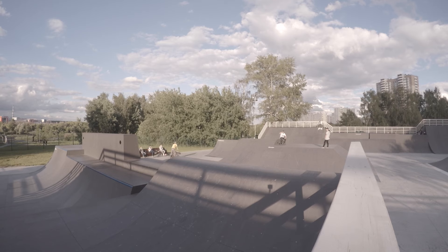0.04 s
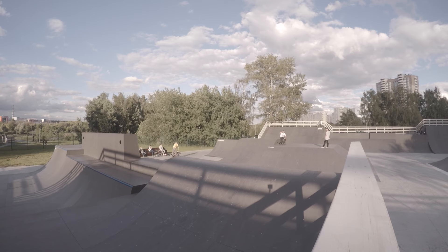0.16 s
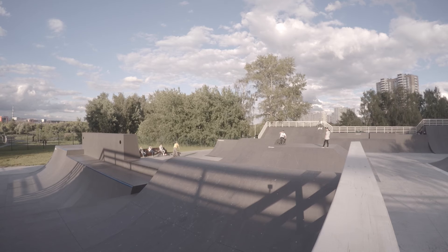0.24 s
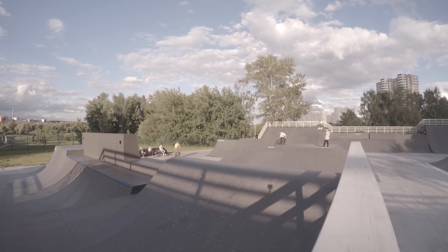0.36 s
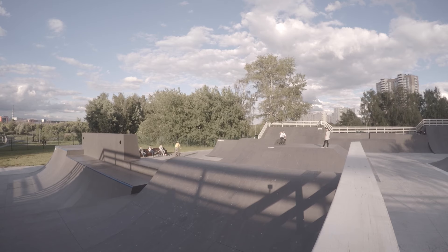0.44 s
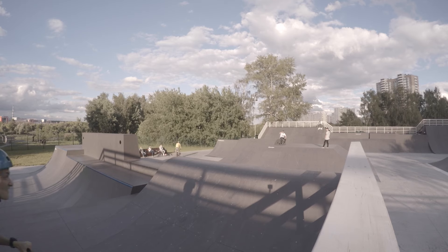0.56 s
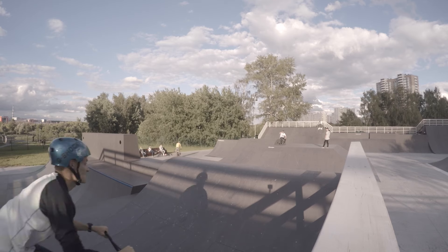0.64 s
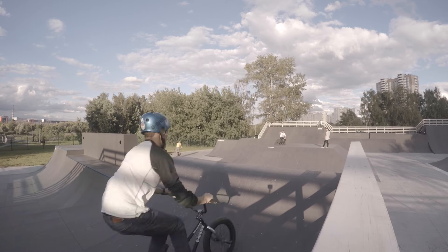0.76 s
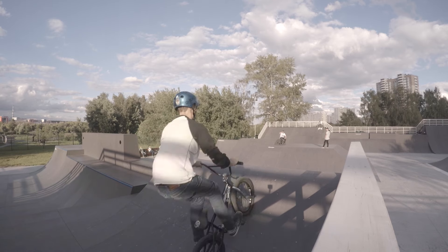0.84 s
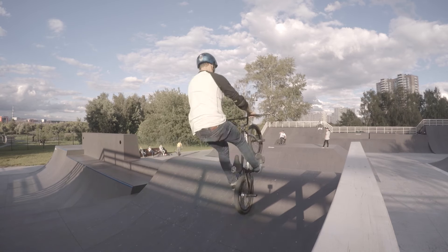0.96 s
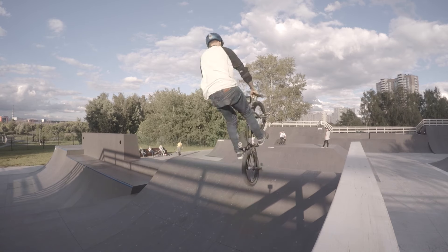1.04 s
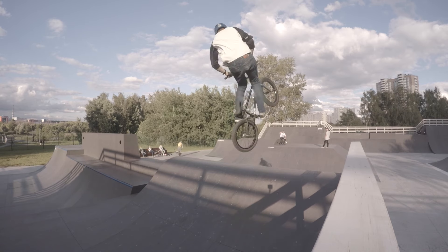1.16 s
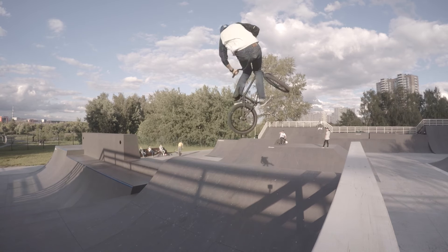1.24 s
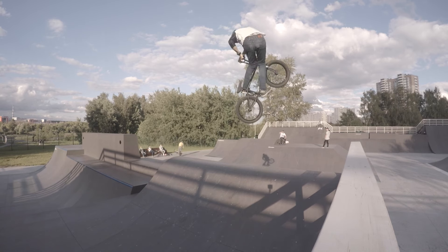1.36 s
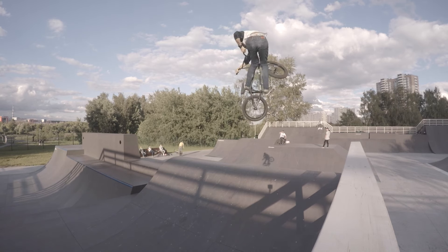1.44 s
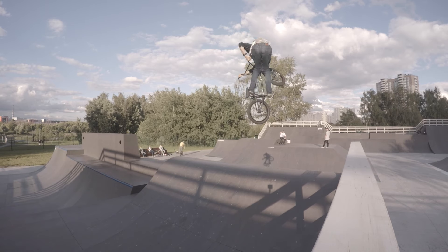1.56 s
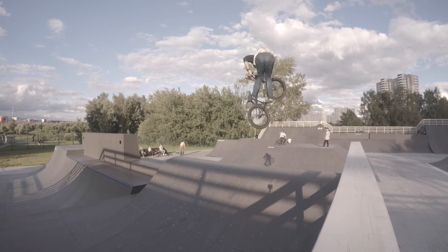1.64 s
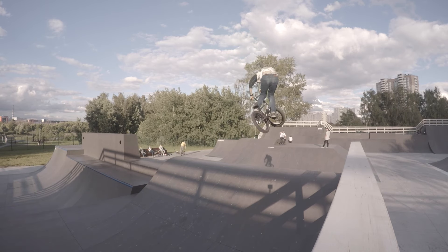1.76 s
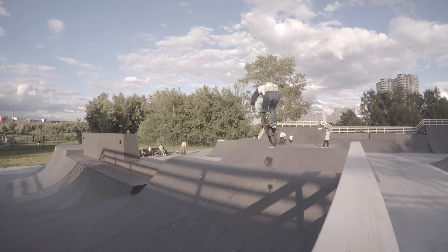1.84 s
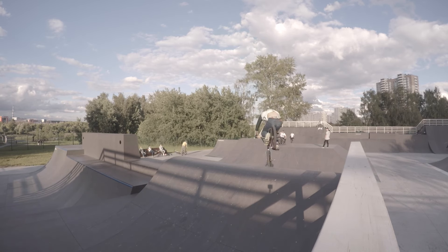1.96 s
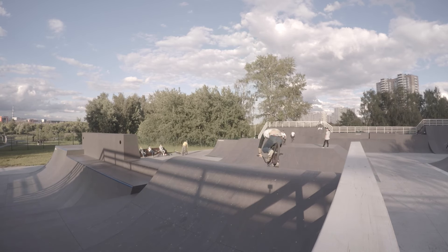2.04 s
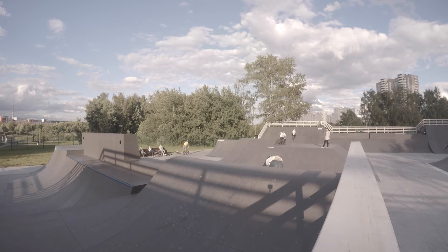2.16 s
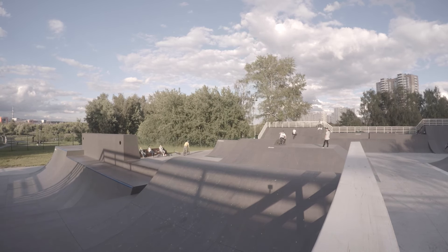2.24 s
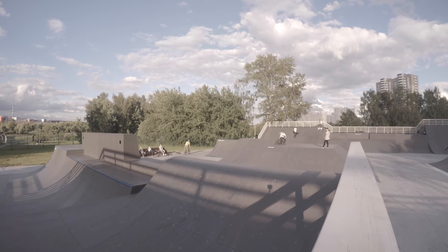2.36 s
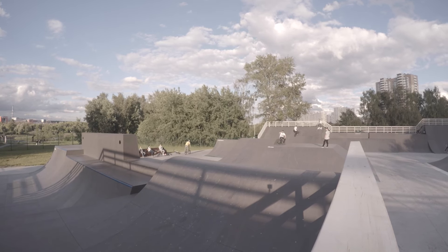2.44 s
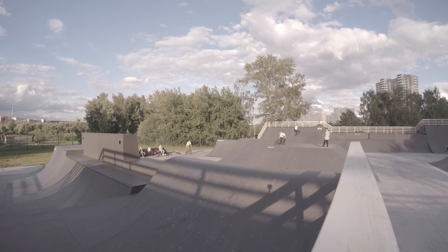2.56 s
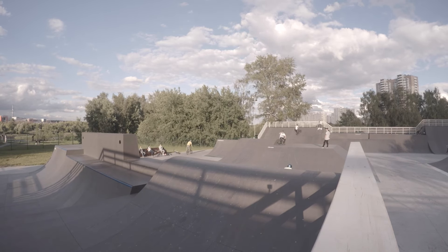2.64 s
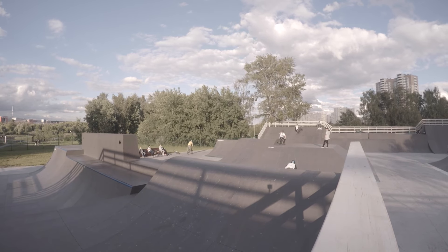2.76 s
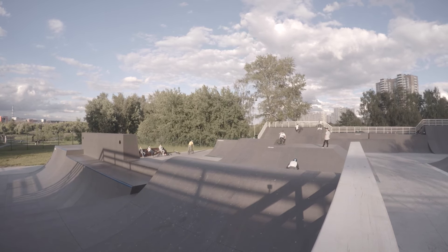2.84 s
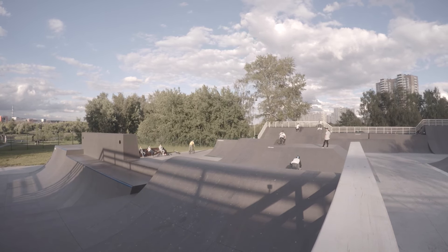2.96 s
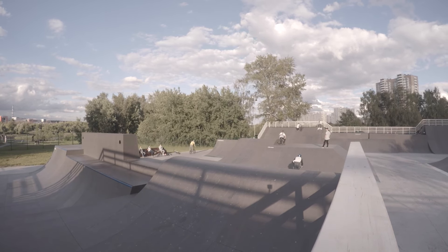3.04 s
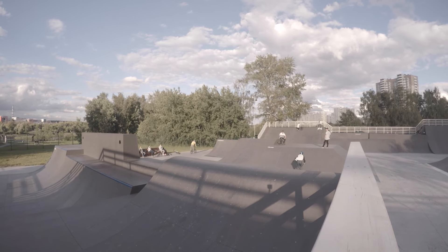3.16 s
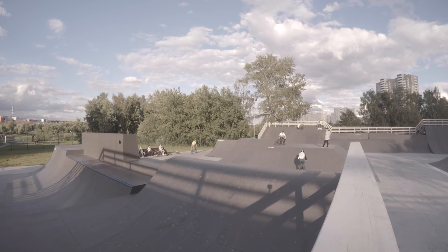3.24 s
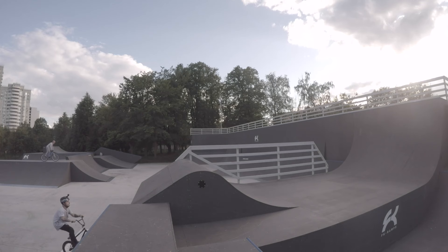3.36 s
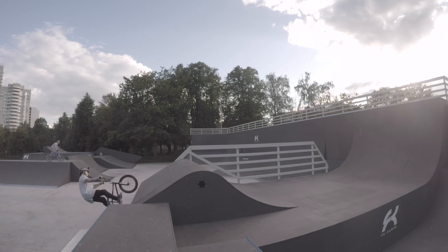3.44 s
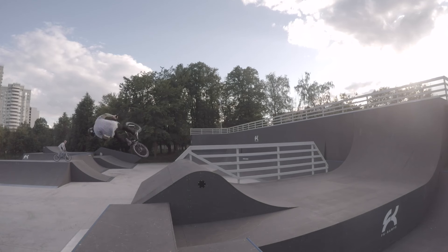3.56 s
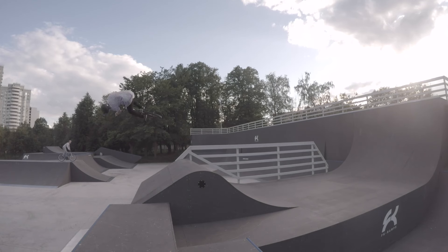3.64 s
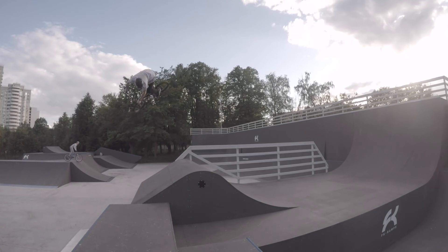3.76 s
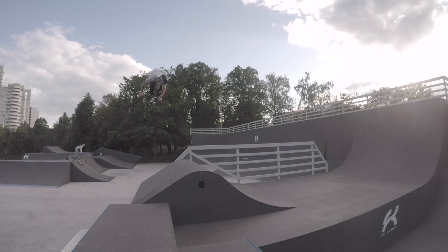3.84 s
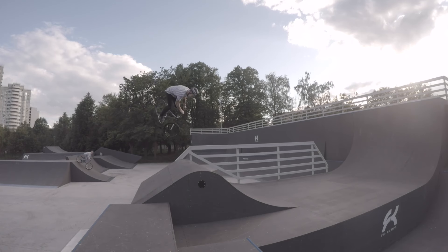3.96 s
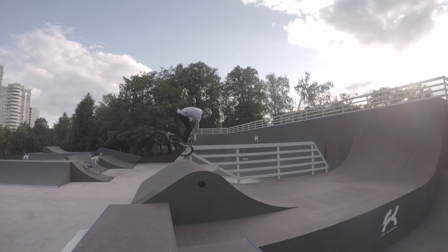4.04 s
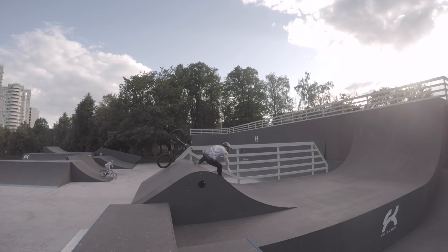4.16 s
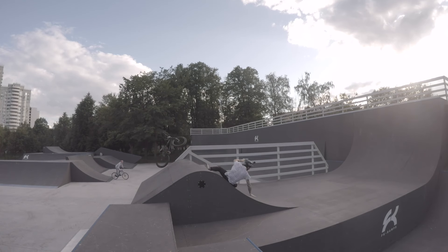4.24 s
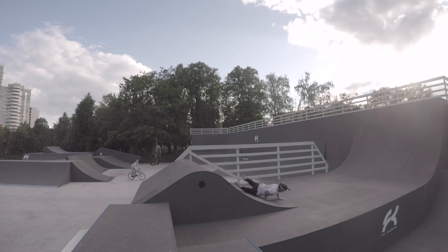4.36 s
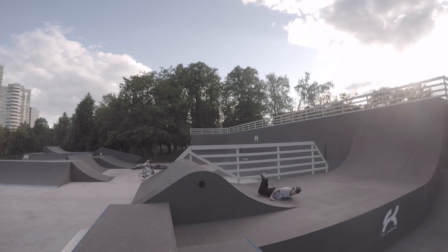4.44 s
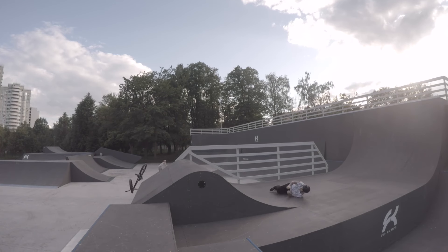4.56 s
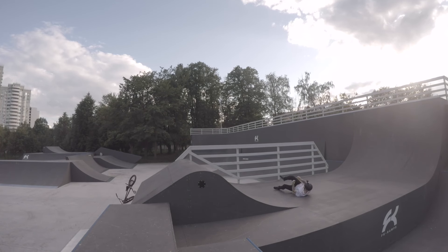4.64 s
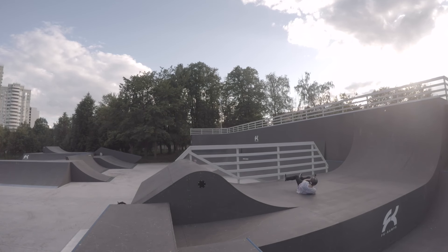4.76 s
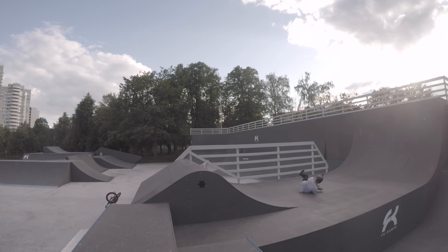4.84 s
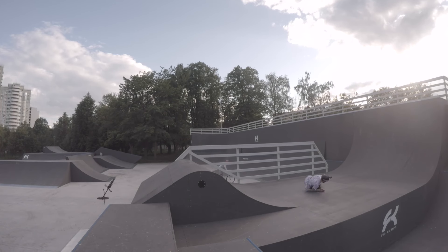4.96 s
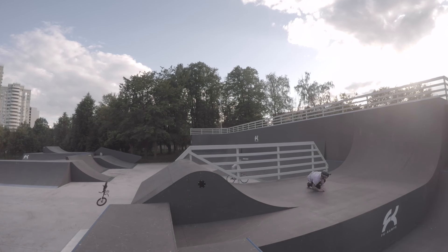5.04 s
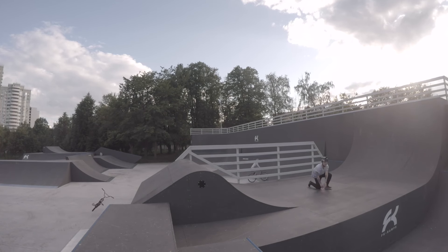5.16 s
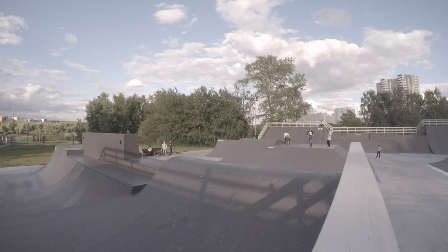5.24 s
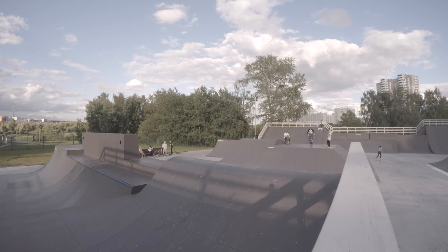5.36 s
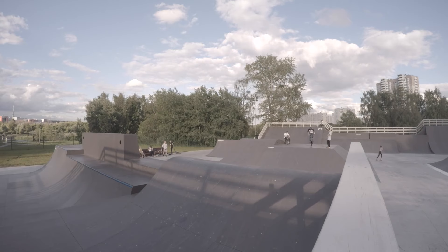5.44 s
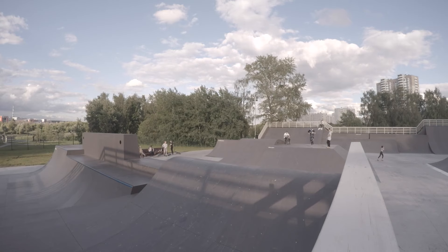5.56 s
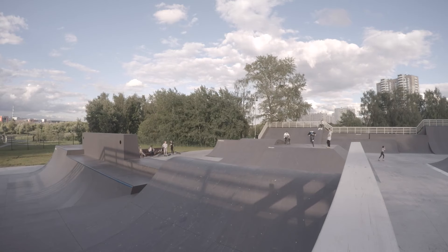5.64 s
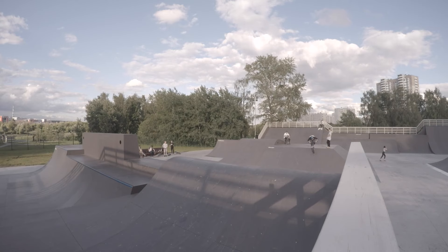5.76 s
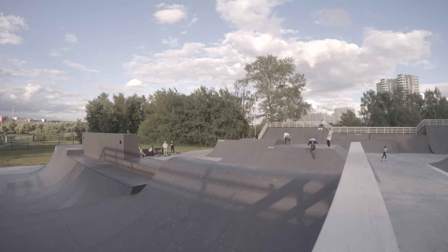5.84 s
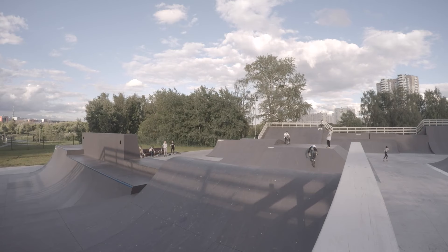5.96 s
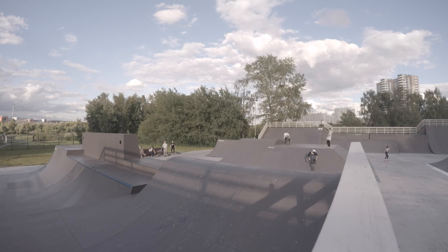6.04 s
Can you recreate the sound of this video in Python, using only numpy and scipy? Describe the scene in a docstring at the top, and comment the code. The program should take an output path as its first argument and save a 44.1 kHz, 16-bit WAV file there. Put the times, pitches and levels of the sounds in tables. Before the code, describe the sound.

Three joined outdoor views of bikes on hollow ramps, heard by one mono wind-buffeted microphone. First tyre roar and hub buzz swell past, turn into sparse ticking during a jump, then a deep landing thud and loose frame clatter. A click marks the cut to a close crash: boom, board knocks, tubes clanking, body and bike rubbing and sliding, metallic tumbles. Finally, distant traffic, low gusts and a tiny squeak.

```python
"""Bikes on hollow wooden ramps

An outdoor skatepark in three joined shots. A bike passes on roaring tyres, its freewheel buzzing as clicks in a hub;
it jumps, lands with a boom and rattles away as clacks in a ringing frame. From a second spot, close by, a rider
crashes: blows ring wood, tubes and small parts over rubbing noise; then the first spot again. Far city traffic
is shaped noise, wind on the microphone is low noise in gusts, and a thin whine is two beating tones."""
import sys
import numpy as np
from scipy import signal
from scipy.fft import rfft, irfft, next_fast_len
from scipy.io import wavfile
from scipy.ndimage import uniform_filter1d, map_coordinates

SR = 44100
rng = np.random.default_rng(int(sys.argv[2]) if len(sys.argv) > 2 else 0)


def linear_from_db(decibels):
    """Turn decibels (scalar or array-like) into linear amplitude factors; 0 gives 1."""
    return 10 ** (np.asarray(decibels, float) / 20)


def pcm_store(signal):
    """Save signal as 16-bit PCM."""
    levels = np.round(np.clip(np.atleast_2d(signal), -1, 1) * 32767)
    wavfile.write(sys.argv[1], SR, levels.astype(np.int16).T)


N = 269010  # length [samples]
TIME = np.arange(N) / SR  # [s]

# Colour of wheels on plywood: (frequency [Hz], relative density [dB])
ROAR_COLOUR = [(200, -14), (550, -12), (850, -10.5), (1370, -26.5), (3000, -49), (9000, -120)]
# Low ground, wind on the microphone and wheels drumming the decks: (time [s], rumble [dB], drumming [dB])
LOW_GROUND = [(0, -34, -35), (.08, -24.5, -34), (1.0, -21, -35), (1.15, -30.5, -49), (2.2, -32, -46),
              (2.6, -26.5, -30), (2.9, -33, -50), (3.24, -32, -53.5), (3.44, -25.5, -28), (3.7, -30.5, -47),
              (4.05, -29, -39), (4.5, -25, -52), (4.8, -22, -35.5), (5.34, -29, -53), (6.1, -35.5, -38.5)]
# Weight dropping on a hollow ramp: (time [s], hold of the boom [s], boom [dB], boards [dB])
RAMP_THUDS = [(0.558, 0, -41, -26), (2.249, 0.091, -11, -14.5), (2.47, 0.024, -18, -35.5),
              (3.504, 0, -9, -49), (4.176, 0.013, -9.5, -13.5), (4.311, 0.049, -20.5, -17.5),
              (4.415, 0.0064, -4, -22), (4.593, 0.081, -15.5, -20.5)]
BOOM_FALL_DB_PER_S = 220


def unit(x):
    """Scale to rms 1."""
    return x / np.sqrt(np.mean(x ** 2) + 1e-20)


def curves(rows, outside=-120):
    """One value per sample for each column after the time; None holds the end values."""
    s, *cols = np.transpose(rows)
    return [np.interp(TIME, s, c, outside, outside) for c in cols]


def wobble(rate):
    """A smooth random curve, rate knots a second."""
    knots = rng.standard_normal(int(N * rate / SR) + 4)
    return map_coordinates(knots, [np.arange(N) * rate / SR])


def filtered(x, response):
    """Multiply the spectrum of x by a complex response of frequency."""
    m = next_fast_len(N + 8192)
    return irfft(rfft(x, m) * response(np.fft.rfftfreq(m, 1 / SR)), m)[:N]


def colour(points):
    """Gain through (Hz, dB) points on a log frequency axis."""
    f, db = np.transpose(points)
    return lambda hz: linear_from_db(np.interp(np.log(hz + 1), np.log(f + 1), db))


def body(modes):
    """Causal response of (Hz, width Hz, dB) resonances, with alternating signs."""
    def response(f):
        total = 0
        for k, (centre, width, db) in enumerate(modes):
            damping = 1j * f * width
            total = total + (-1) ** k * linear_from_db(db) * damping / (centre * centre - f * f + damping)
        return total
    return response


def dull(x, top_hz):
    """Weaken steeply what lies above top_hz."""
    return filtered(x, lambda f: 1 / (1 + (f / top_hz) ** 8))


def rush(response, patchy_db):
    """Coloured noise of rms 1 with patches of random gain in time and frequency."""
    z = signal.stft(rng.standard_normal(N), nperseg=512)[2]
    field = uniform_filter1d(rng.standard_normal(z.shape), 5, 0)
    field = uniform_filter1d(field, 8, 1)
    patchy = signal.istft(z * linear_from_db(patchy_db * unit(field)), nperseg=512)[1][:N]
    return unit(filtered(patchy, response))


def steady(x, seconds):
    """Even out the chance swells of narrow noise that are slower than seconds."""
    power = np.abs(uniform_filter1d(x * x, max(3, int(seconds * SR))))
    return unit(x / np.sqrt(power + 0.018))


def bursts(times, levels_db, lengths, attack=0.0008):
    """Envelope of sudden contacts that die by 60 dB in their length [s]."""
    out, t = np.zeros(N + SR), np.arange(SR // 4) / SR
    for s, db, life in zip(times, levels_db, lengths):
        out[round(s * SR):][:len(t)] += linear_from_db(db - 60 * t / life) * (1 - np.exp(-t / attack))
    return out[:N]


def swells(times, holds, levels_db, fall_db_per_s):
    """Sum of gains that rise at 800 dB/s to a level, hold it and fall away."""
    total = np.zeros(N)
    for s, hold, db in zip(times, holds, levels_db):
        before = 800 * (s - TIME)
        after = fall_db_per_s * (TIME - s - hold)
        total += linear_from_db(db - np.maximum(0, np.maximum(before, after)))
    return total


def struck(envelope, modes):
    """Contact noise under an envelope rings a body."""
    noise = np.tanh(rng.standard_normal(N))  # an even grain, so that strength follows the envelope
    return filtered(envelope * noise, body(modes)) / np.std(filtered(noise, body(modes)))


def passing_bike():
    """Tyres roar, hiss and hum; the freewheel's pawls click in the steel hub."""
    # The pass: (time [s], tyre roar [dB], tyre hiss or low hub ring [dB], high hub ring [dB])
    pass_levels = [(0, -34, -43.5, -53), (0.15, -39, -46, -56), (0.4, -49.5, -47.5, -52.5),
                   (0.65, -43.5, -43, -56.5), (0.85, -35.5, -37, -59.5), (1.03, -44, -44.5, -65),
                   (1.12, -48, -57, -64.5), (1.8, -58, -56.5, -64.5), (2.2, -72, -67, -80)]
    # Tread hum, at last speeding up toward the lip: (time [s], pitch [Hz], hum [dB], octave [dB])
    tread = [(.3, 252, -49, -54), (.55, 237.2, -43, -48), (.68, 259.3, -41.5, -52),
             (.79, 314.5, -39.5, -40), (.98, 338, -46.5, -45)]
    # Freewheel rolling, then in the air, wavering as the bike turns: (time [s], click rate [1/s])
    pawls = [(0, 190), (.55, 120), (.75, 170), (1, 126), (1.1, 66), (1.2, 43), (1.31, 66), (1.42, 60),
             (1.49, 42.6), (1.56, 54), (2.2, 67)]
    # Tyre hiss: (frequency [Hz], relative density [dB])
    hiss_colour = [(1400, -5), (2600, -1.5), (3300, -0.5), (4050, 1.5), (5600, -12.5), (13000, -24)]
    # Low ring of the hub shell: (centre [Hz], width [Hz], relative level [dB])
    shell_modes = [(2400, 900, -6), (3700, 380, 0), (4550, 380, 0)]
    # High ring of the hub: (centre [Hz], width [Hz], relative level [dB])
    hub_modes = [(7740, 930, 8), (9730, 1600, 5), (12700, 3300, 2), (14800, 1500, 3)]

    roar_db, mid_db, hub_db = curves(pass_levels)
    hz, hum_db, octave_db = curves(tread)
    speed = np.maximum(hz, 0) * (1 + 0.018 * wobble(30.9))  # zero outside the table
    turn = 2 * np.pi * np.cumsum(speed) / SR
    tones = linear_from_db(hum_db) * np.sin(turn) + linear_from_db(octave_db) * np.sin(2 * turn)
    hum = np.sqrt(2) * linear_from_db(2 * wobble(25)) * tones

    rate, = curves(pawls, None)
    teeth = np.cumsum(rate * (1 + 0.019 * wobble(40))) / SR
    # each tooth snaps with uneven size and fades by 60 dB in 12 ms, over a constant floor
    since = (teeth % 1) / rate
    size_db = 3.2 * rng.standard_normal(N)[teeth.astype(int)]
    snap = linear_from_db(size_db - 60 * since / .012) + .1
    clicks = snap * rush(np.ones_like, patchy_db=2)

    # once the tyres leave the ramp their hiss stops and the hub's low ring is left
    airborne = np.clip((TIME - 1.0) / .06, 0, 1)
    hiss = rush(colour(hiss_colour), patchy_db=3.0)
    low_ring = unit(filtered(clicks, body(shell_modes)))
    mid = (1 - airborne) * hiss + airborne * low_ring
    high_ring = unit(filtered(clicks, body(hub_modes)))
    roar = linear_from_db(roar_db + 1.8 * wobble(20)) * rush(colour(ROAR_COLOUR), patchy_db=2.5)
    return roar + hum + linear_from_db(mid_db) * mid + linear_from_db(hub_db) * high_ring


def rattle():
    """Frame and chain clack in clusters of ticks; each clack catches each resonance more or less."""
    # The wheels land, then frame and chain clack unevenly: (time [s], relative level [dB])
    jolts = [(2.2479, -14), (2.264, -15), (2.272, -12), (2.2807, -13.5), (2.297, -24), (2.31, -23),
             (2.329, -21), (2.344, -23), (2.377, -24.5), (2.389, -21.5), (2.4127, -23), (2.4393, -22),
             (2.4633, -22), (2.4817, -22.5)]
    # Loose parts settle into a steady shake: (start [s], end [s], gap [s])
    shake_span = (2.512, 2.9, .0412)
    # Frame resonances: (centre [Hz], width before the filter is cubed [Hz], relative level [dB])
    frame_modes = [(964, 870, -8), (2010, 1620, -13), (2680, 600, -23), (4770, 1100, -27),
                   (6450, 760, -38.5), (7000, 670, -38)]

    shake = np.arange(*shake_span)
    chance = rng.standard_normal((len(shake), 2))
    shake_db = -26.5 - 29 * (shake - shake[0]) + 1.8 * chance[:, 0]  # fades 29 dB/s, scatters 1.8 dB
    shake = shake + .0015 * chance[:, 1]  # scatter in time [s]
    second = shake + .3 * np.gradient(shake)  # each shake strikes again 0.3 of the gap later
    jolt, jolt_db = np.transpose(jolts)
    s, db = np.r_[jolt, shake, second], np.r_[jolt_db, shake_db, shake_db]
    clacks = bursts(s, db, 0 * s + 0.07, attack=0.003) * unit(linear_from_db(1.8 * wobble(400)))
    sound = np.zeros(N)
    for hz, width, level_db in frame_modes:
        steep = lambda f: body([(hz, width, 0)])(f) ** 3
        noise = np.tanh(rng.standard_normal(N))
        caught = linear_from_db(level_db + 2 * wobble(60))
        sound += filtered(clacks * caught * noise, steep) / np.std(filtered(noise, steep))
    return sound


def blows():
    """Blows knock boards, clank in tubes, clink in small parts and echo; one row adds to the join's click."""
    # Blows, and at 3.4372 s the click at the join of two shots; levels before the trims below:
    # (time [s], clank [dB], knock above clank [dB], clink above clank [dB])
    hits = [(3.2639, -36, 14, 4), (3.364, -31, 8.5, 3.5), (3.4372, -31, 15.5, 5.5), (4.1488, -32, -9, 5.5),
            (4.1641, -3.5, 7.5, -15.5), (4.325, -35, 1, -3.5), (4.411, -24.5, 8.5, -3.5),
            (4.433, -43.5, 29.5, 4), (4.575, -23, 7, -4), (4.587, -18, 14.5, -14), (4.8135, -15, 5.5, -11),
            (4.821, -12, -0.5, -4), (4.828, -13.5, 3.5, -12), (4.86, -26, 11, -11), (4.9053, -32, 3, -3),
            (5.235, -39, 19, 1.5), (5.283, -26.5, 8, -12), (5.303, -42, 8, 6)]
    # Resonances of the boards: (centre [Hz], width [Hz], relative level [dB])
    wood = [(302, 147, -7.5), (530, 236, -8.5), (778, 273, -6.5), (981, 385, -11)]
    # The frame's clank: (centre [Hz], width [Hz], relative level [dB])
    tubes = [(1440, 130, 13), (1920, 180, 10), (2283, 127, 15), (2910, 700, 4.5)]
    # Small steel parts: (centre [Hz], width [Hz], relative level [dB])
    parts = [(3600, 130, 4), (4000, 300, 0), (4650, 300, 3), (5550, 450, 0)]
    # Bright edge of each row: (centre [Hz], width [Hz], relative level [dB])
    shine = [(8100, 2200, -3.5), (10400, 1900, 0)]
    # Bright glancing scuffs: (time [s], level [dB])
    swishes = [(4.326, -49), (4.433, -35)]
    # Short knocks on a board: (time [s], level [dB], pitch [Hz])
    hollow_knocks = [(3.7765, -12, 818), (3.805, -11, 616), (3.846, -10, 810), (3.884, -18, 840),
                     (4.492, -17.5, 1270)]

    s, db, knock_db, clink_db = np.transpose(hits)

    def blow(level_db, life):
        echo = bursts(s, level_db - 20, 0 * s + .15)  # from the ramps
        return bursts(s, level_db, 0 * s + life) + echo

    knock = dull(struck(blow(db + knock_db - 6.5, 0.053), wood), top_hz=1970)
    clank = dull(struck(blow(db - 5, 0.019), tubes), top_hz=4360)
    clink = dull(struck(blow(db + clink_db - 2.5, 0.016), parts), top_hz=6000)
    swish, swish_db = np.transpose(swishes)
    edge_s = np.r_[s, swish]
    bright = bursts(edge_s, np.r_[db - 38, swish_db], 0 * edge_s + 0.045)
    hollow = np.zeros(N)
    for at, level_db, hz in hollow_knocks:
        hollow += bursts([at], [level_db], [0.028]) * np.sin(2 * np.pi * hz * (TIME - at))
    return knock + clank + clink + struck(bright, shine) + hollow


def near_ramp():
    """Wheels and bodies rub the nearer ramp: a lumpy roar with a gritty scrape on top."""
    # The rubbing: (time [s], roar [dB], scrape [dB])
    rubbing = [(3.44, -31.5, -55.5), (3.6, -29.5, -52.5), (3.82, -24, -56), (4.0, -29.5, -59),
               (4.22, -31, -47), (4.4, -29, -56), (4.7, -26, -71), (4.92, -26.5, -46), (5.03, -28.5, -51.5),
               (5.13, -25, -63.5), (5.32, -30, -53)]
    # Scrape: (frequency [Hz], relative density [dB])
    scrape_colour = [(900, -6), (1400, -1.5), (2300, -3.5), (3000, -5.5), (5200, -7.5), (6200, -14.5),
                     (15000, -29)]

    roar, scrape = uniform_filter1d(linear_from_db(curves(rubbing)), size=130)  # starts and stops within 3 ms
    roar = roar * linear_from_db(1.4 * wobble(70)) * rush(colour(ROAR_COLOUR), patchy_db=1.5)
    grit = unit(linear_from_db(2.5 * wobble(150)))
    return roar + scrape * grit * rush(colour(scrape_colour), patchy_db=1)


def squeaks():
    """Rubber squeaks as short gliding tones."""
    # Squeaks: (time [s], length [s], start pitch [Hz], end pitch [Hz], peak [dB])
    glides = [(3.135, .028, 2850, 2690, -47), (5.105, .055, 880, 930, -26), (5.883, .024, 2420, 2380, -49)]

    out = np.zeros(N)
    for s, length, start_hz, end_hz, db in glides:
        n = int(length * SR)
        tone = np.sin(2 * np.pi * np.cumsum(np.linspace(start_hz, end_hz, n)) / SR)
        out[int(s * SR):][:n] += linear_from_db(db) * np.hanning(n) ** .5 * tone
    return out


def cut_click():
    """A sudden step at the join of two shots, falling with a 0.3 ms time constant."""
    t = TIME - 3.4383
    return linear_from_db(-14) * (t >= 0) * np.exp(-np.abs(t) / .0003)


def drumming_decks():
    """Rolling wheels and dropping weight set the hollow ramps' boards humming."""
    # Resonances of the ramp's boards: (centre [Hz], width [Hz], relative level [dB])
    deck_modes = [(104.8, 20, 6.5), (192, 266, -7)]

    _, deck_db = curves(LOW_GROUND, None)
    s, _, _, boards_db = np.transpose(RAMP_THUDS)
    drum = linear_from_db(deck_db) + swells(s, 0 * s, boards_db, fall_db_per_s=209)
    boards = body(deck_modes)
    noise = rush(lambda f: boards(f) / (1 + (f / 320) ** 4), patchy_db=1.0)
    return drum * steady(noise, seconds=0.0375)


def wind_and_booms():
    """Wind pushes on the microphone and hollow ramps boom, as low noise that swells and falls."""
    # Low rumble: (frequency [Hz], relative density [dB])
    rumble_colour = [(15, -12), (28, 1.5), (60, -2), (100, -9.5), (300, -120)]
    # Gusts: (frequency [Hz], relative density [dB])
    gust_colour = [(15, -25.5), (35, 5), (55, -11.5), (80, -22), (200, -120)]
    # Wind gusts on the microphone: (time [s], hold [s], level [dB])
    gusts = [(0.447, 0.079, -12.5), (5.903, 0.23, -15.5)]

    def low(points):
        return steady(rush(colour(points), patchy_db=2.5), seconds=0.075)

    rumble_db, _ = curves(LOW_GROUND, None)
    s, hold, boom_db, _ = np.transpose(RAMP_THUDS)
    rumble = linear_from_db(rumble_db) * low(rumble_colour)
    gust = swells(*np.transpose(gusts), BOOM_FALL_DB_PER_S) * low(gust_colour)
    boom = swells(s, hold, boom_db, BOOM_FALL_DB_PER_S) * low(rumble_colour)
    return rumble + gust + boom


def far_traffic():
    """City traffic far off: coloured noise whose level wavers slowly and quickly."""
    # Traffic: (frequency [Hz], relative density [dB])
    traffic_colour = [(100, -21), (280, -7.5), (530, -10.5), (900, -2.5), (1150, -8.5), (1490, -26.5),
                      (3170, -29), (6500, -35.5), (15500, -47.5)]

    level_db = -44.5 + .7 * wobble(2.6) + .9 * wobble(15)
    return linear_from_db(level_db) * rush(colour(traffic_colour), patchy_db=1)


def thin_whine():
    """A faint high whine: a close pair of tones beating."""
    # The pair: pitches [Hz]
    whine_hz = [10700, 10725]

    return linear_from_db(-79) * sum(np.sin(2 * np.pi * hz * TIME) for hz in whine_hz)


def scene():
    """Everything as one microphone hears it."""
    bike = passing_bike() + rattle()
    crash = blows() + near_ramp() + squeaks() + cut_click()
    surroundings = drumming_decks() + wind_and_booms() + far_traffic() + thin_whine()
    return (bike + crash + surroundings)[None]


def band_limit(x):
    """A steep low-pass at the top of the band."""
    return signal.sosfilt(signal.butter(12, 16480, fs=SR, output="sos"), x)


def record(dry):
    """The input stage clips the loudest peaks and keeps nothing above its band limit."""
    clipped = np.clip(dry[0], -.9, .9)
    finished = filtered(clipped, lambda f: f < 15800)
    return band_limit(finished[None])


dry = scene()
out = record(dry)
pcm_store(out)
```